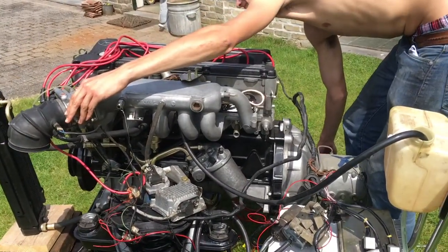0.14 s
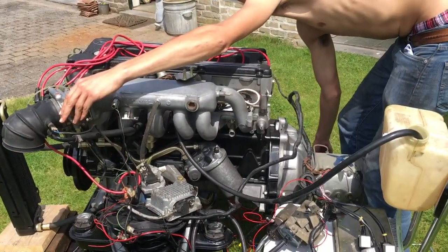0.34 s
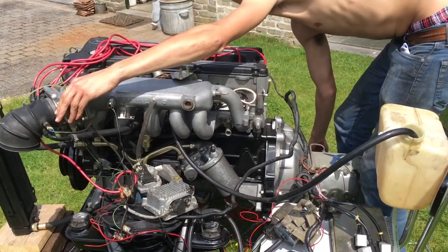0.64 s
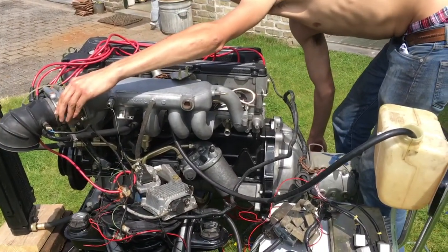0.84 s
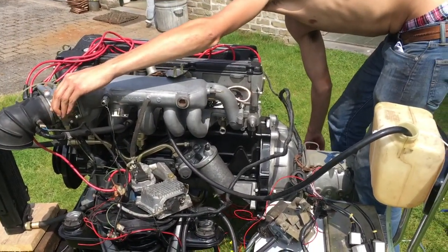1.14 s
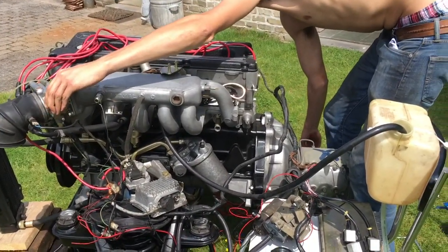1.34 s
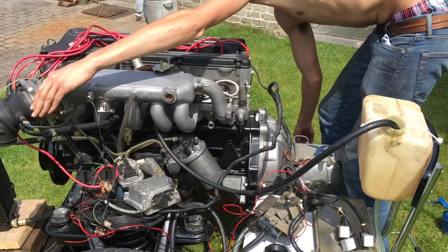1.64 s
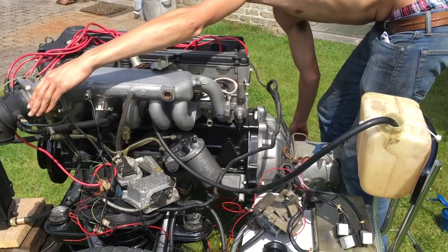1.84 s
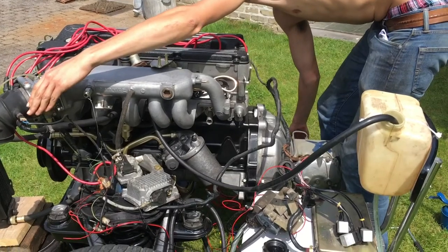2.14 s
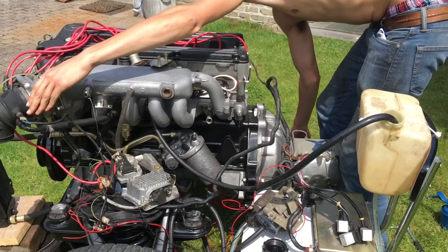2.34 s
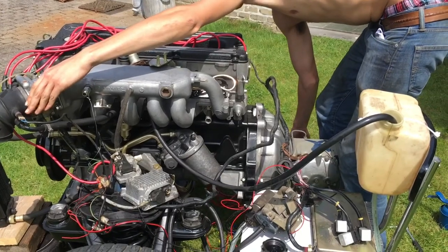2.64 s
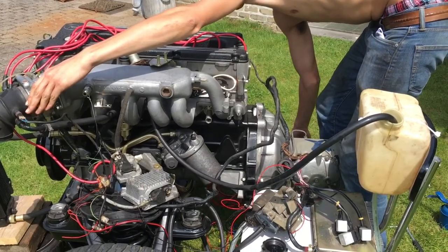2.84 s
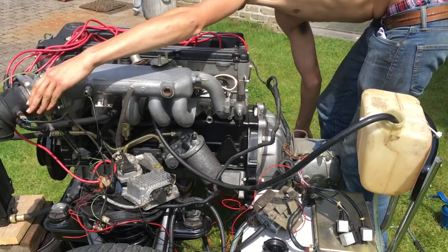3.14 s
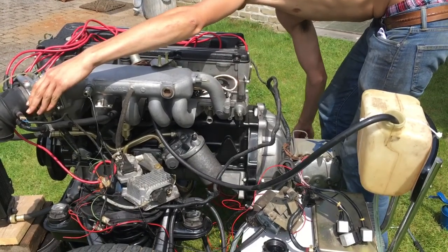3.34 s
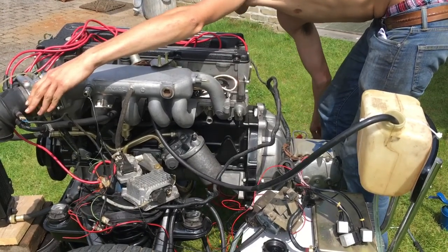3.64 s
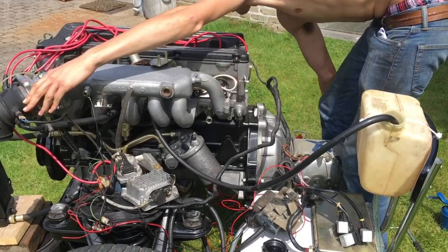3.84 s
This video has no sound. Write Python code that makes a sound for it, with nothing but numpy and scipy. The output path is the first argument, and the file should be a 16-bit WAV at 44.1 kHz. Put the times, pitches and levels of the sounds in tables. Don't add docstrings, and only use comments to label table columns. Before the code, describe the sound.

A petrol engine with open exhausts idles roughly, revs once, coasts, sputters and dies with a clunk.

```python
import sys
import numpy as np
from scipy import signal
from scipy.fft import rfft, irfft, next_fast_len
from scipy.io import wavfile
from scipy.ndimage import uniform_filter1d, map_coordinates

SR = 44100
rng = np.random.default_rng(int(sys.argv[2]) if len(sys.argv) > 2 else 0)


def persist_wave(psi):
    counts = np.round(np.clip(psi, -1, 1) * 32767).astype(np.int16)
    wavfile.write(sys.argv[1], SR, np.atleast_2d(counts).T)


def rack_gain(trim_db):
    fader = np.asarray(trim_db, float)
    return 10 ** (fader / 20)


N = 176400

JITTER_S = .0005
BLAST_RISE_S, BLAST_T60_S = .0019, .04
THUMP_TOP_HZ, PUMP_TOP_HZ = 297.5, 226


def unit(x):
    return x / np.sqrt(np.mean(x ** 2) + 1e-20)


def noise():
    return rng.standard_normal(N)


def curve(rows, s=None):
    t, v = np.transpose(rows)
    return np.interp(np.arange(N) / SR if s is None else s, t, v)


def wobble(rate):
    return map_coordinates(rng.standard_normal(int(N * rate / SR) + 4), [np.arange(N) * rate / SR])


def filtered(x, response):
    m = next_fast_len(N + SR // 2)
    return irfft(rfft(x, m) * response(np.fft.rfftfreq(m, 1 / SR)), m)[..., :N]


def resonances(table):
    return lambda f: sum(rack_gain(db) * 1j * f * w / (c * c - f * f + 1j * f * w) for c, w, db in table)


def coloured(points):
    f, v = np.transpose(points)
    return unit(filtered(noise(), lambda hz: rack_gain(np.interp(np.log(hz + 1), np.log(f), v, -120, -120))))


def patchy(x, patch_db):
    z = signal.stft(x, nperseg=256)[2]
    field = uniform_filter1d(rng.standard_normal(z.shape), size=3, axis=0)
    field = uniform_filter1d(field, size=4, axis=1)
    return unit(signal.istft(z * rack_gain(patch_db * unit(field)), nperseg=256)[1][:N])


def train(s, db):
    return np.bincount(np.clip(np.round(s * SR).astype(int), 0, N - 1), rack_gain(db), N)


def bursts(s, db, t60):
    echo_s, echo_db = .0121, -12
    tail_db, tail_t60 = -19.5, .17
    t = np.arange(SR // 5) / SR
    rise = 1 - np.exp(-(t / BLAST_RISE_S) ** 2)
    shape = rise * (rack_gain(-60 * t / t60) + rack_gain(tail_db - 60 * t / tail_t60))
    env = signal.fftconvolve(train(s, db) + train(s + echo_s, db + echo_db), shape)[:N]
    return env / np.sqrt(np.mean(env[:SR // 2] ** 2))


# (time [s], exhaust openings [per s])
SPEED = [(0, 48.73), (.4, 46.39), (.8, 43.98), (1.15, 41.59), (1.3, 44.59), (1.45, 52.53), (1.6, 75.16),
         (1.7, 91.16), (1.77, 92.81), (1.95, 83.45), (2.15, 68.64), (2.33, 53.27), (2.45, 50.63),
         (2.8, 45.53), (3.1, 39.79), (3.3, 38.13), (3.55, 26.59), (4, 17.2)]
# (start [s], end [s])
UNFIRED = [(.83, .85), (1.11, 1.132), (1.273, 1.318), (1.382, 1.402), (1.494, 1.51), (1.817, 1.845),
           (1.88, 1.892), (1.93, 1.988), (2.026, 2.333), (2.39, 2.428), (2.45, 2.468), (2.651, 2.673),
           (2.915, 2.938), (3.312, 4.1)]
CYLINDER_BLAST_DB = [0.5, 0.5, -1, 3.5, -3, 0.5]


def openings():
    turns = np.cumsum(curve(SPEED)) / SR - .9
    count = np.arange(-1, int(turns[-1]) + 1)
    s = np.interp(count, turns, np.arange(N) / SR)
    fired = ~np.any([(s > a) & (s < b) for a, b in UNFIRED], axis=0)
    return s, count % len(CYLINDER_BLAST_DB), fired


# (frequency [Hz], width [Hz], level [dB])
PIPE = [(69, 27, -2.5), (89.5, 15, 0), (142.9, 11.8, 5), (171.5, 11.9, 8.5), (275.5, 13.7, -3.5)]


def thumps(s, fired, size_db, chance):
    suck, suck_s = .35, .0043
    pulses = train((s + JITTER_S * chance[:, 1])[fired], size_db[fired])

    def pipe(f):
        blunt = 1 / (1 + (f / THUMP_TOP_HZ) ** 6)
        return resonances(PIPE)(f) * blunt * (1 - suck * np.exp(2j * np.pi * f * suck_s))

    rung = filtered(pulses, pipe)
    return rung / np.std(rung[:SR // 2])


# (frequency [Hz], width [Hz], level [dB])
COOL_PIPE = [(73.4, 20, -2.5), (100.5, 11.7, -2), (127.6, 11.6, 2.5), (155.2, 14.2, 2), (283.7, 18, -8.5)]
# (time [s], level [dB])
PUMP = [(0, -32.5), (1.4, -19), (1.8, -13.5), (2.05, -15.5), (2.33, -19.5), (2.6, -24), (3.25, -24.5),
        (3.4, -21), (3.71, -23.5), (3.76, -32.5), (3.8, -27.5), (3.88, -32.5), (3.93, -45), (4, -29.5)]


def pumped_air(s, chance):
    scatter_db, jitter_s, intake_db = 1.8, .0005, -8
    eddy_share, slow_gain_db, stall_rate = .14, 14, 34
    exhaust_strokes = train(s + jitter_s * chance[:, 2], scatter_db * chance[:, 3])
    intake_s = s + np.gradient(s) / 2 + jitter_s * chance[:, 6]
    strokes = exhaust_strokes + train(intake_s, intake_db + scatter_db * chance[:, 7])
    cool = lambda f: resonances(COOL_PIPE)(f) / (1 + (f / PUMP_TOP_HZ) ** 4)
    pulses = unit(filtered(strokes, cool))
    eddies = unit(filtered(noise(), lambda f: cool(f) / (1 + (f / THUMP_TOP_HZ) ** 6)))
    slow = curve(SPEED) < stall_rate
    air = pulses + eddy_share * rack_gain(slow_gain_db * slow) * eddies
    local_rms = np.sqrt(np.abs(uniform_filter1d(air ** 2, size=SR // 5)))
    return rack_gain(curve(PUMP)) * air / local_rms


# (frequency [Hz], width [Hz], level [dB])
SWIRL_PIPE = [(275, 42, 1.5), (535.5, 156, -6.5)]


def swirl(s, fired, size_db):
    octaves = np.log2(curve(SPEED) / 83.3)
    flow = rack_gain(1.5 + 24 * octaves + 3.5 * wobble(25.17))
    turbulence = unit(filtered(noise(), lambda f: resonances(SWIRL_PIPE)(f) ** 2))
    return (bursts(s[fired], size_db[fired], BLAST_T60_S) + flow) * turbulence


# (time [s], level [dB])
CHARGE = [(0, 0), (.6, -2), (1.2, .5), (1.4, 3), (1.6, 3.5), (1.68, 0), (1.78, -5.5), (1.9, -16),
          (2.03, -16.5), (2.34, -1.5), (2.46, -4), (2.6, -3.5), (3.0, -0.5), (3.3, -.5)]
CYLINDER_THUMP_DB = [-0.38, 0.15, -.6, -.4, 0.5, 0.18]


def exhaust(s, cylinder, fired, chance):
    thump_db, scatter_db, swirl_db = -15.5, 1.2, -32.5
    own_db = np.array(CYLINDER_THUMP_DB)[cylinder]
    size_db = 1.1 * curve(CHARGE, s) + own_db + scatter_db * chance[:, 0]
    s = s + .0082
    out = rack_gain(thump_db) * thumps(s, fired, size_db, chance)
    out = out + pumped_air(s, chance)
    return out + rack_gain(swirl_db) * swirl(s, fired, size_db)


# (frequency [Hz], level [dB], decay t60 [s])
SHELL = [(1204, -8, 0.04), (1552, -4, 0.076), (1753, -4, 0.051), (2106, -6.5, 0.04), (2623, -6.5, 0.07),
         (2910, -7, 0.051), (3140, -7.5, 0.056), (3670, -0.5, 0.053), (4070, 0, 0.049), (4420, 0.5, 0.025),
         (4860, -5, 0.035), (6080, -3, 0.042), (7000, -2.5, 0.035)]


def shell_rings(s, size_db):
    scatter_db, pitch_spread, stagger_s = 5, .025, .004
    hz, level, t60 = np.transpose(SHELL)[:, None, :, None]
    lags = np.arange(SR // 16)
    luck = rng.standard_normal((len(s), 4, len(SHELL), 1))
    t = np.maximum(lags / SR - stagger_s * np.abs(luck[:, 3]), 0)
    decay = rack_gain(level + scatter_db * luck[:, 0] - 60 * t / t60)
    phase = 2 * np.pi * (hz * (1 + pitch_spread * luck[:, 1]) * t + luck[:, 2])
    rise = 1 - np.exp(-(t / BLAST_RISE_S) ** 2)
    rings = (decay * np.sin(phase) * rise).sum(1) * rack_gain(size_db)[:, None]
    at = np.clip(np.round(s * SR).astype(int), 0, N)[:, None] + lags
    shell = np.bincount(at.ravel(), rings.ravel(), N + SR)[:N]
    return shell / np.std(shell[:SR // 2])


# (frequency [Hz], level [dB per Hz])
BLAST = [(240, -27), (400, -8.5), (545, -8), (814, -9.5), (1600, -7), (3420, -1), (4180, -3), (9760, -12.5),
         (16000, -22)]
# (frequency [Hz], width [Hz], level [dB])
JET = [(9150, 370, 0.5), (9680, 450, 1), (11000, 550, -16)]
# (time [s], level [dB])
LEAK = [
    (0, -2.5),
    (.6, 4),
    (1.1, -1),
    (1.5, -1.5),
    (1.75, -11),
    (2.0, -28),
    (2.34, 5),
    (2.45, -1.5),
    (2.55, -0.5),
    (3.3, 1),
]


def blasts(s, cylinder, chance):
    hiss_db, jet_db, shell_db = -29, -24.5, -27.5
    scatter_db, patch_db, jet_t60 = 3, 4.5, .035
    charge_db, own_db = curve(CHARGE, s), np.array(CYLINDER_BLAST_DB)[cylinder]
    s = s - .0045 + JITTER_S * chance[:, 1]
    blast_db = 2.24 * charge_db + own_db + scatter_db * chance[:, 4]
    hiss = bursts(s, blast_db, BLAST_T60_S) * patchy(coloured(BLAST), patch_db)
    whistle = patchy(filtered(noise(), resonances(JET)), patch_db)
    jet = bursts(s, curve(LEAK, s) + own_db + scatter_db * chance[:, 5], jet_t60) * whistle
    shell = shell_rings(s, charge_db + own_db)
    return rack_gain(hiss_db) * hiss + rack_gain(jet_db) * jet + rack_gain(shell_db) * shell


# (time [s], length [s], start pitch [Hz], end pitch [Hz], level [dB])
SQUEAKS = [
    (3.66, .045, 660, 560, -41),
    (3.795, .04, 9800, 9400, -30),
    (3.825, .015, 9300, 8200, -35),
    (3.795, .045, 6100, 5300, -35),
]
# (time [s], level [dB])
KNOCKS = [
    (3.873, -38),
    (3.893, -38.5),
    (3.984, -59),
]
# (frequency [Hz], level [dB], decay t60 [s])
BLOCK = [(734, 1, 0.12), (900, -5, .06), (1070, -1.5, .06), (1530, -1, .06), (2250, -9, .04)]


def stopping():
    t, out = np.arange(N) / SR, np.zeros(N)
    hump = lambda s, length: np.sin(np.pi * np.clip((t - s) / length, 0, 1))
    for s, length, start_hz, end_hz, db in SQUEAKS:
        glide = np.interp(t, [s, s + length], [start_hz, end_hz])
        hz = glide * (1 + .01 * wobble(900))
        out += rack_gain(db + 3 * wobble(300)) * hump(s, length) * np.sin(2 * np.pi * np.cumsum(hz) / SR)
    puff = coloured([(3000, -15), (6000, 3), (10000, -2), (16000, -10)])
    out += rack_gain(-40) * hump(3.79, .07) * puff
    for s, db in KNOCKS:
        u = np.maximum(t - s, 0)
        ring = np.zeros(N)
        for hz, level, t60 in BLOCK:
            ring += rack_gain(level + rng.normal(0, 3) - 60 * u / t60) * np.sin(2 * np.pi * hz * u)
        click = .64 * rack_gain(-60 * u / .012) * noise()
        out += rack_gain(db) * (t > s) * (ring + click)
    return out


# (time [s], level [dB])
GEAR = [(0, -34), (1.7, -29), (2.05, -40), (2.33, -45.5), (2.5, -34.5), (3.3, -36.5), (3.45, -45.5),
        (3.65, -42.5), (3.8, -39.5), (3.93, -53.5), (4, -46.5)]
# (frequency [Hz], level [dB per Hz])
GEAR_TONE = [(300, -17), (500, -8), (1150, -1.5), (3000, -1.5), (4500, -6.5), (6850, -7), (10000, -13.5),
             (16000, -33)]
# (frequency [Hz], width [Hz], level [dB])
GEAR_RINGS = [(1123, 220, -2.5), (2910, 360, 1), (4080, 210, -3.5), (5960, 430, -4), (6750, 210, -6.5),
              (9360, 460, -10)]


def gear():
    beat = np.cos(2 * np.pi * np.cumsum(curve(SPEED)) / SR)
    level_db = curve(GEAR) + .5 * beat + 2.4 * wobble(60) + .89 * wobble(8)
    rings = unit(filtered(noise(), resonances(GEAR_RINGS)))
    return rack_gain(level_db) * unit(coloured(GEAR_TONE) + .71 * rings)


def scene():
    s, cylinder, fired = openings()
    chance = rng.standard_normal((len(s), 8))
    engine = exhaust(s, cylinder, fired, chance) + blasts(s[fired], cylinder[fired], chance[fired])
    return (engine + stopping() + gear())[None]


def roll_off(x):
    return signal.sosfilt(signal.butter(12, 16170, fs=SR, output="sos"), x)


def record(dry):
    bass_hz, top_hz, ceiling, knee = 38, 16100, 1.0, 6
    x = filtered(dry, lambda f: f ** 4 / (bass_hz ** 4 + f ** 4))
    x = x / (1 + np.abs(x / ceiling) ** knee) ** (1 / knee)
    x = filtered(x, lambda f: f < top_hz)
    return roll_off(x)


dry = scene()
out = record(dry)
persist_wave(out)
```